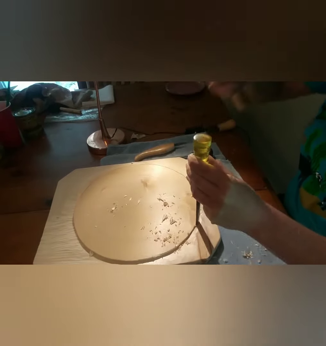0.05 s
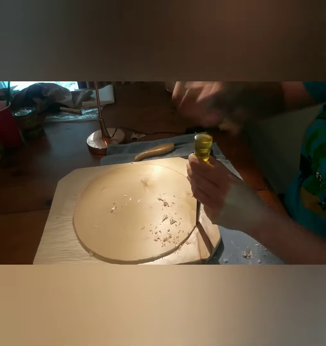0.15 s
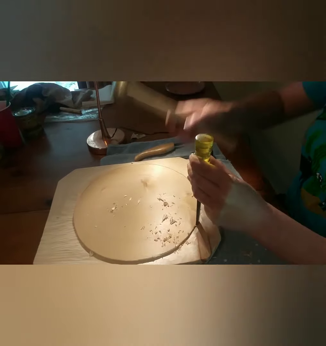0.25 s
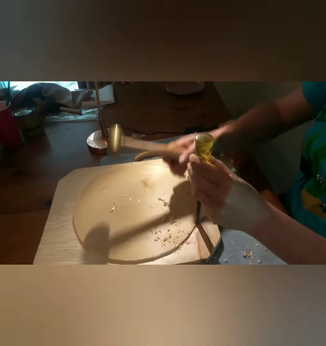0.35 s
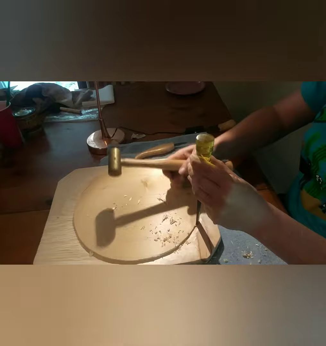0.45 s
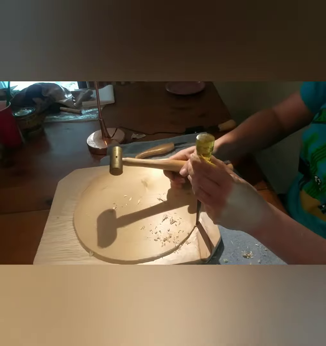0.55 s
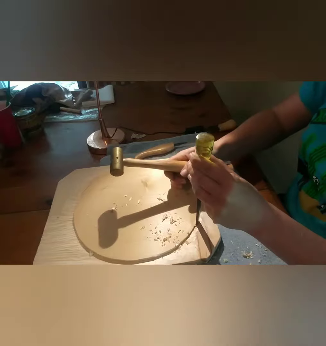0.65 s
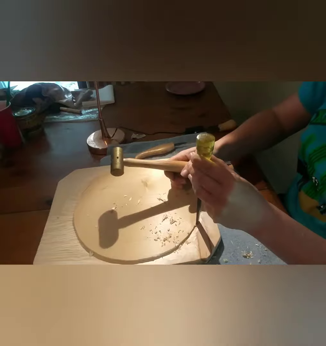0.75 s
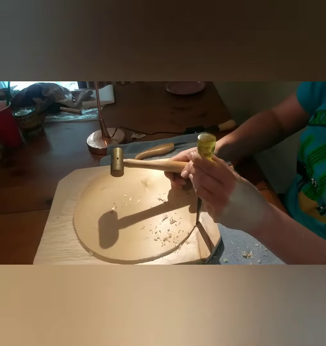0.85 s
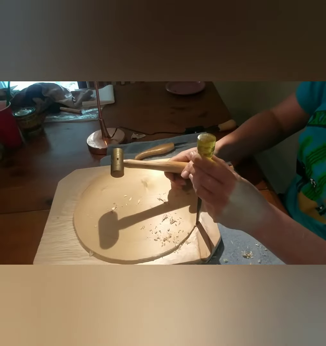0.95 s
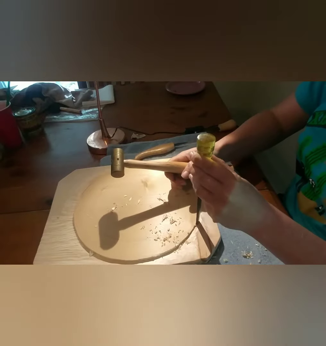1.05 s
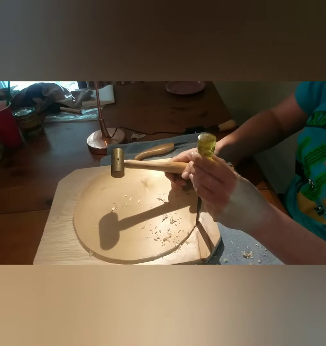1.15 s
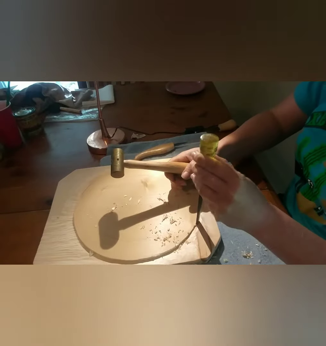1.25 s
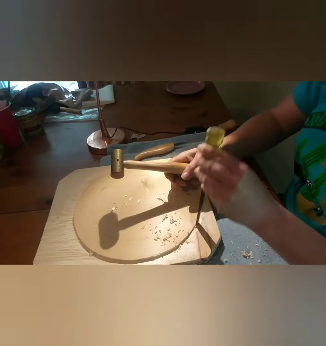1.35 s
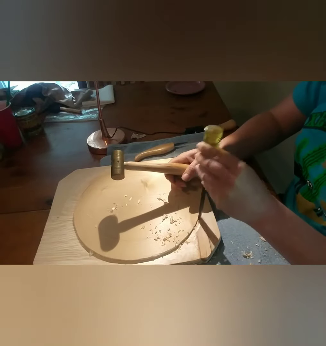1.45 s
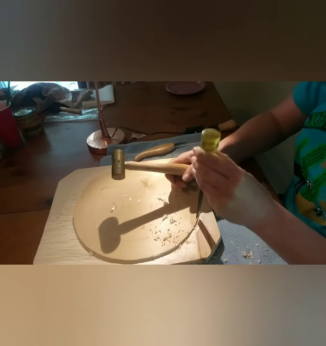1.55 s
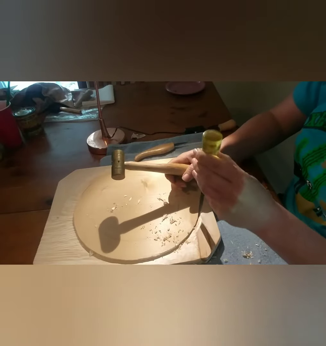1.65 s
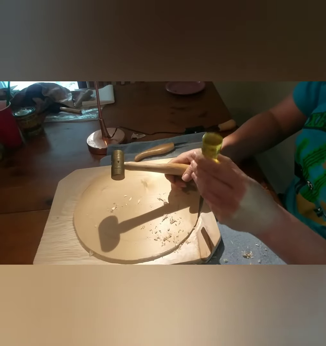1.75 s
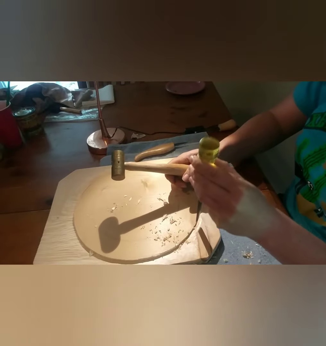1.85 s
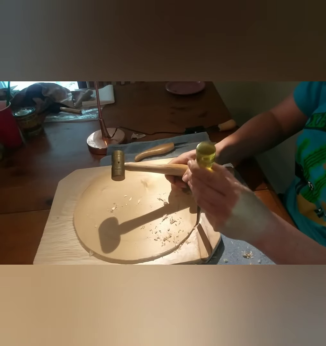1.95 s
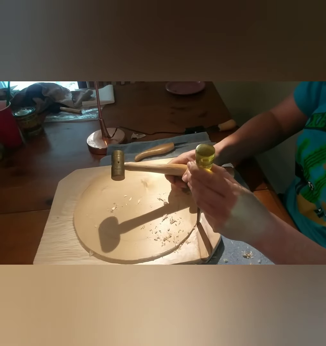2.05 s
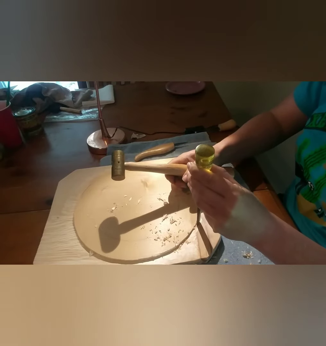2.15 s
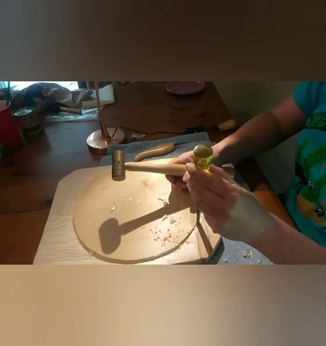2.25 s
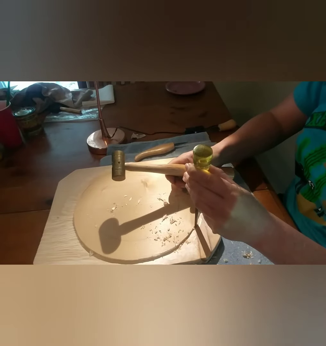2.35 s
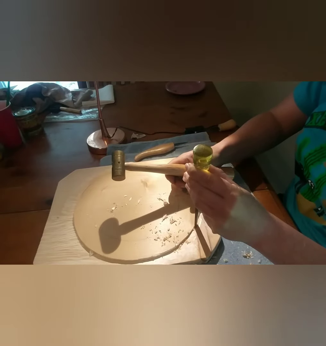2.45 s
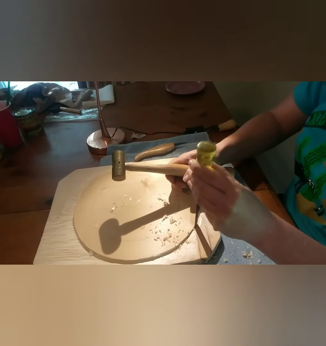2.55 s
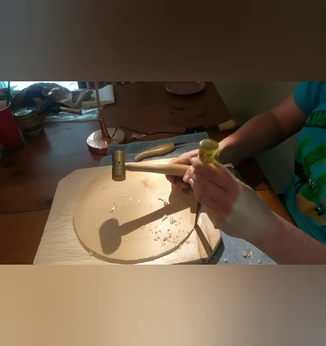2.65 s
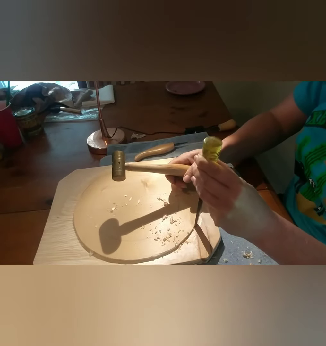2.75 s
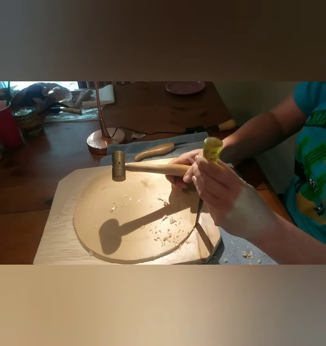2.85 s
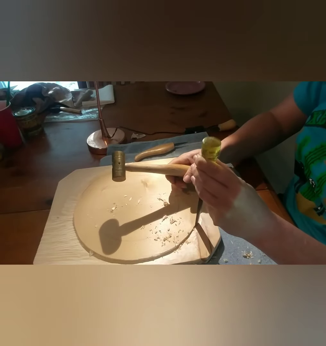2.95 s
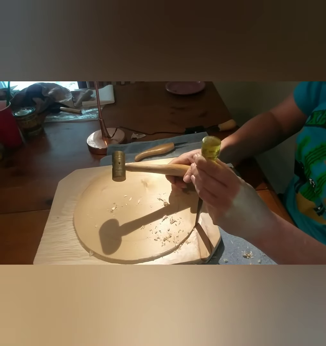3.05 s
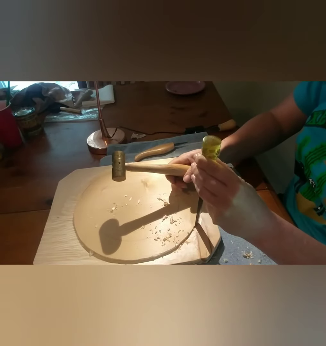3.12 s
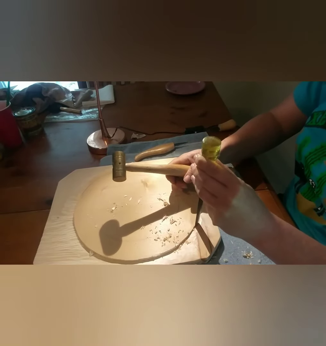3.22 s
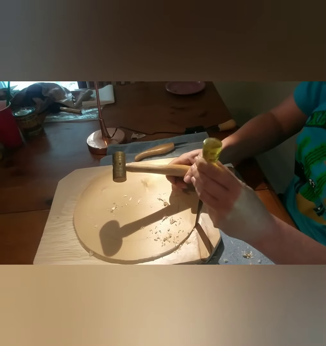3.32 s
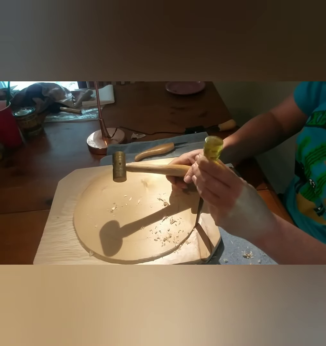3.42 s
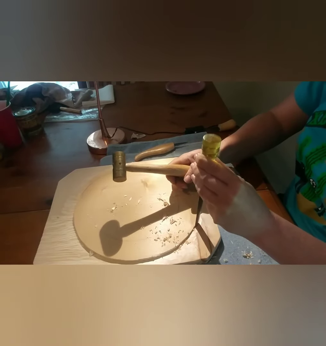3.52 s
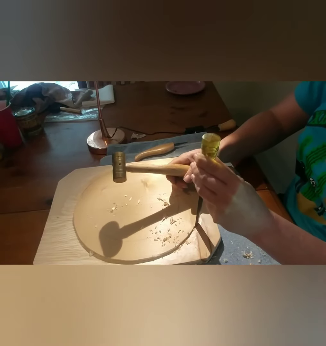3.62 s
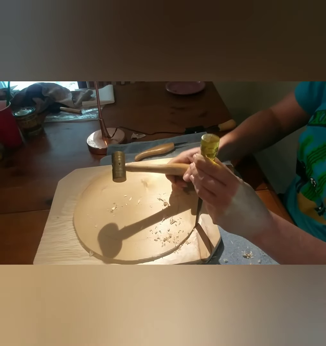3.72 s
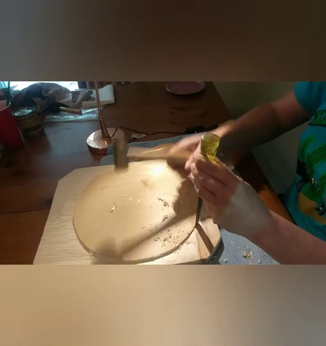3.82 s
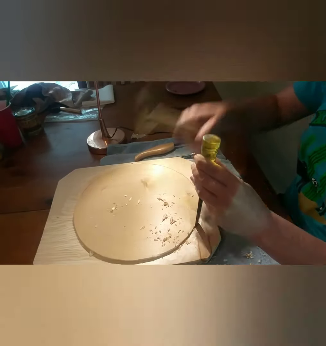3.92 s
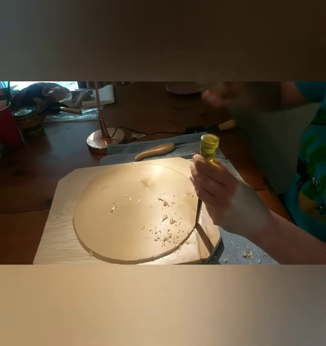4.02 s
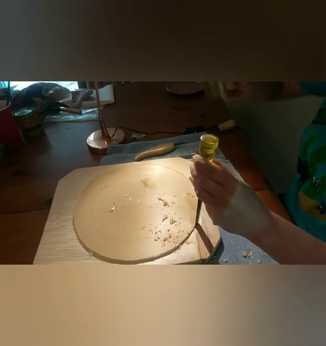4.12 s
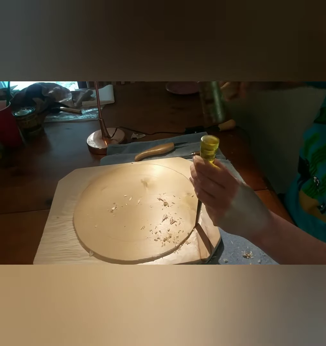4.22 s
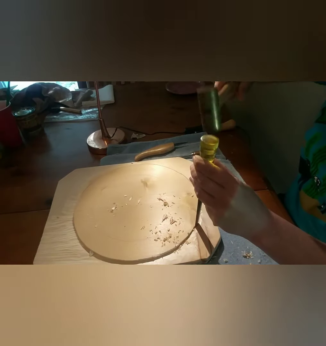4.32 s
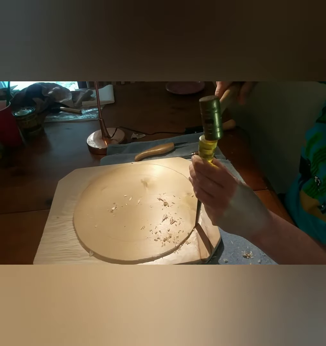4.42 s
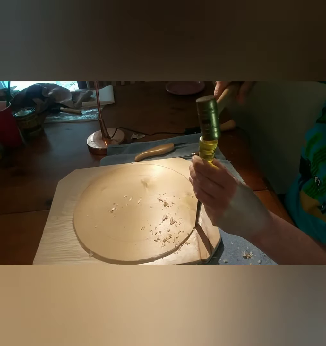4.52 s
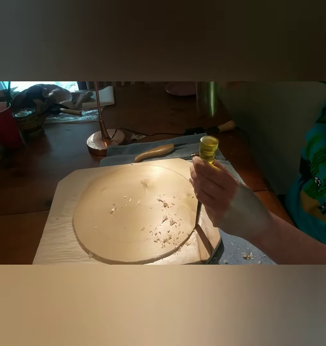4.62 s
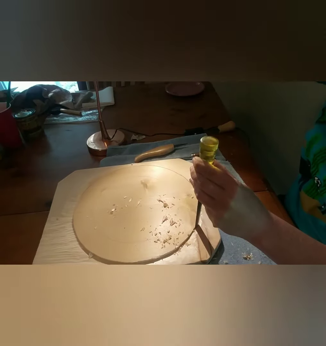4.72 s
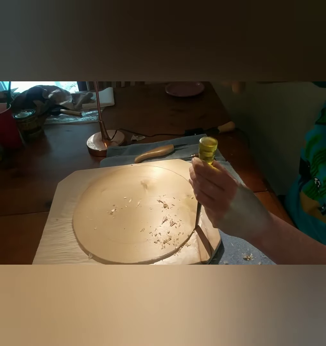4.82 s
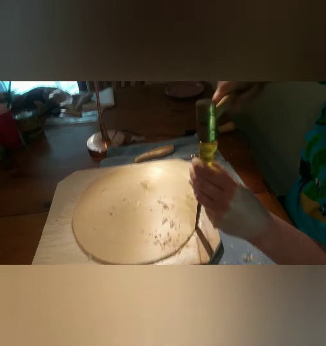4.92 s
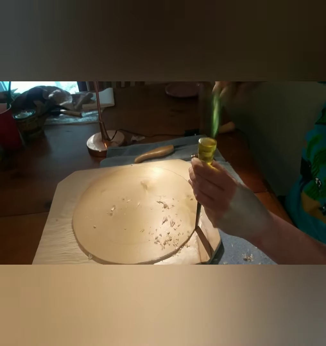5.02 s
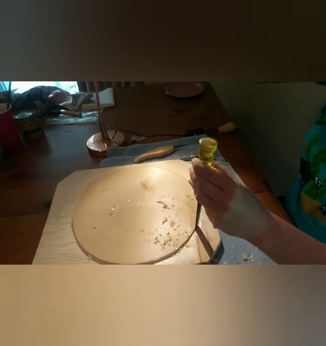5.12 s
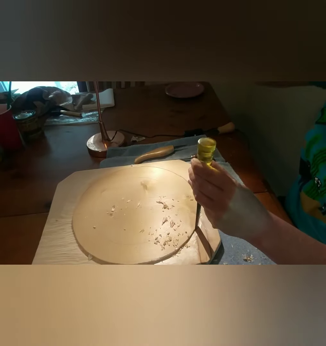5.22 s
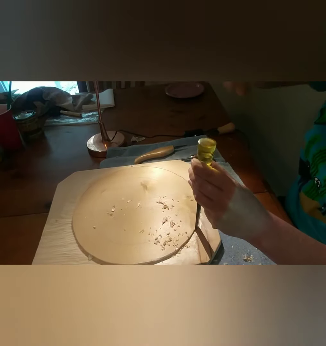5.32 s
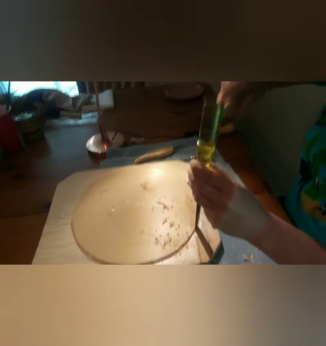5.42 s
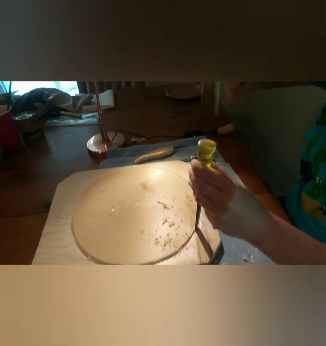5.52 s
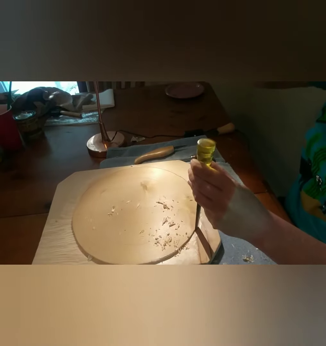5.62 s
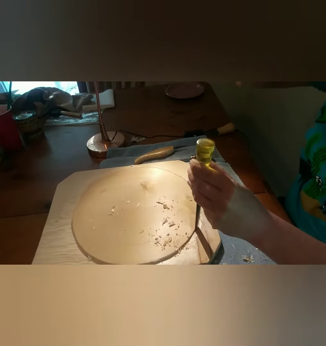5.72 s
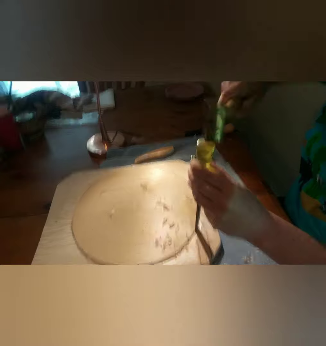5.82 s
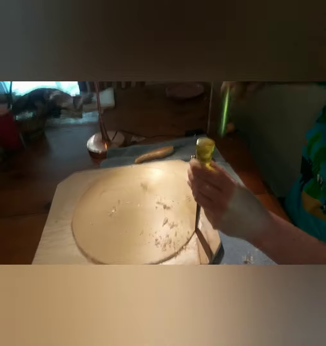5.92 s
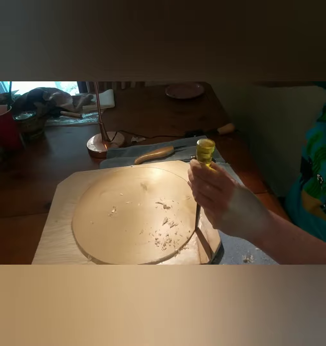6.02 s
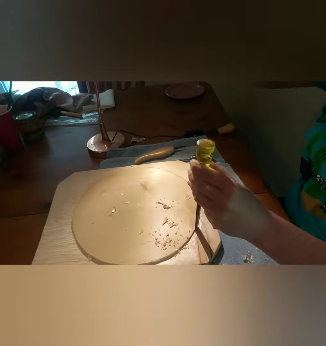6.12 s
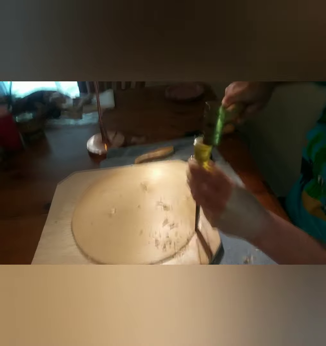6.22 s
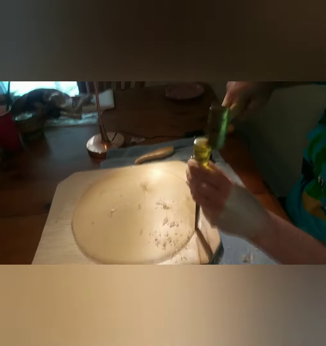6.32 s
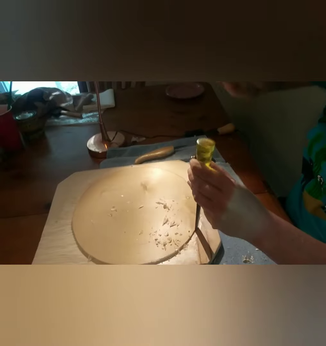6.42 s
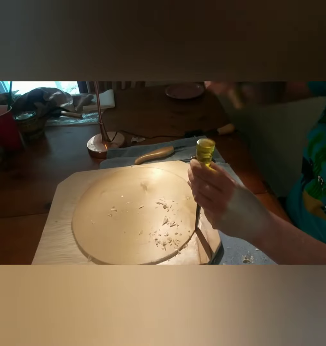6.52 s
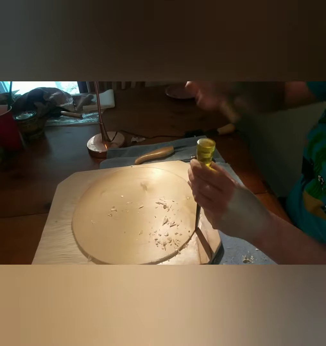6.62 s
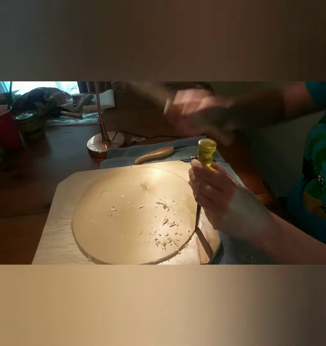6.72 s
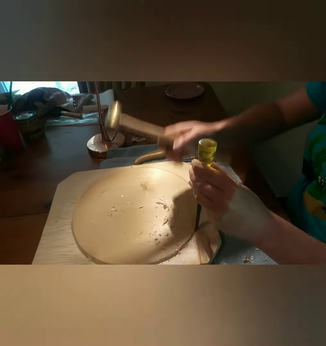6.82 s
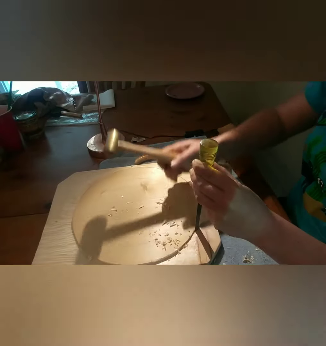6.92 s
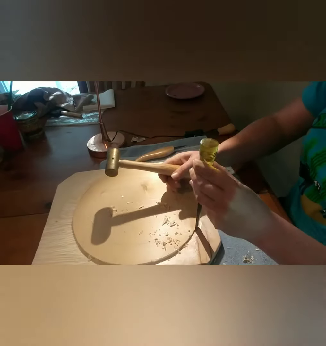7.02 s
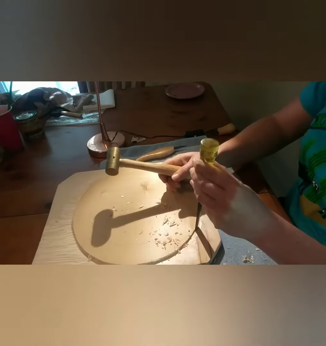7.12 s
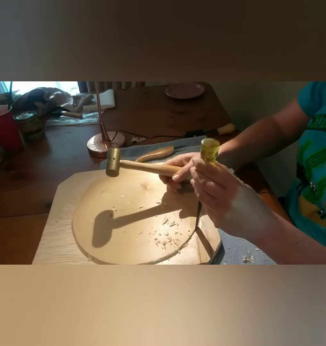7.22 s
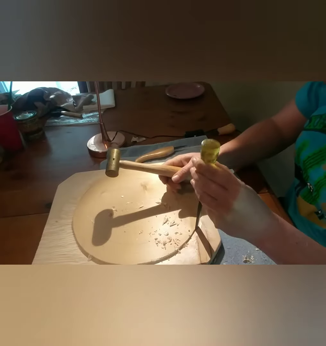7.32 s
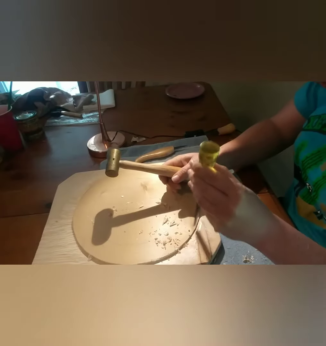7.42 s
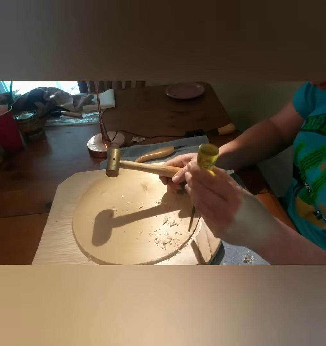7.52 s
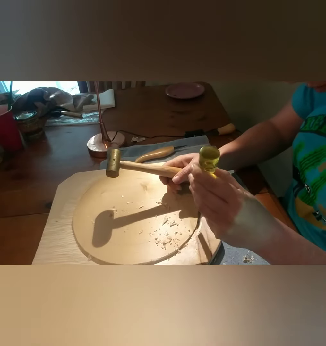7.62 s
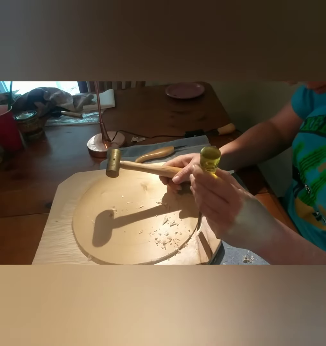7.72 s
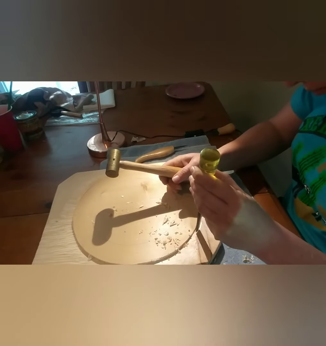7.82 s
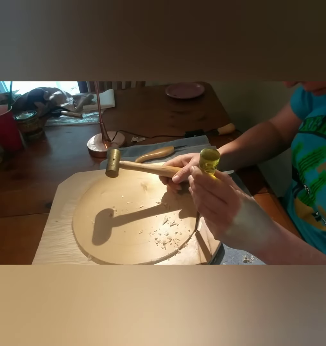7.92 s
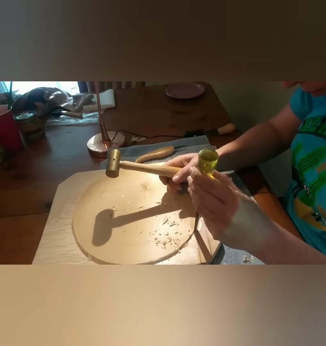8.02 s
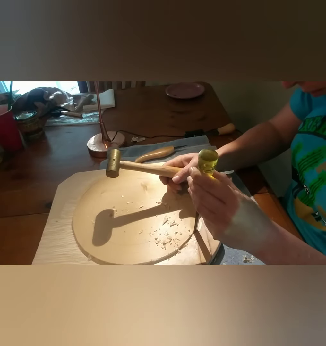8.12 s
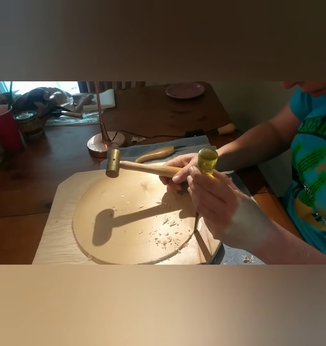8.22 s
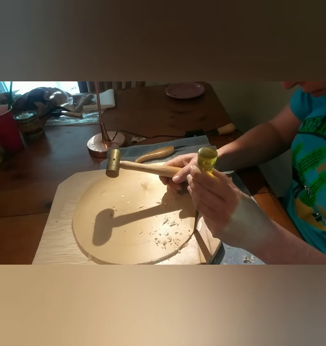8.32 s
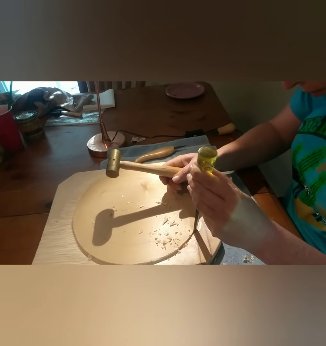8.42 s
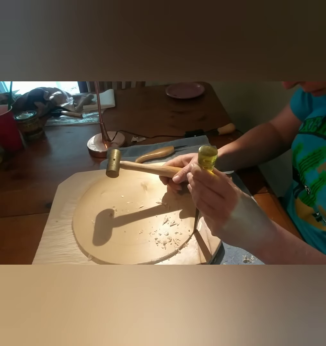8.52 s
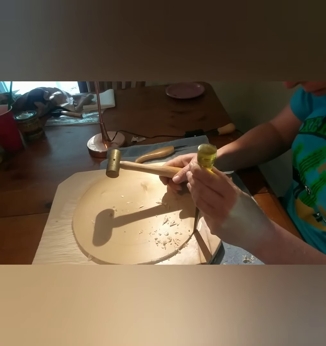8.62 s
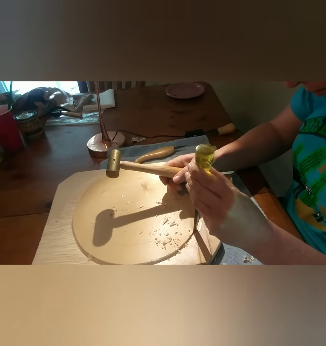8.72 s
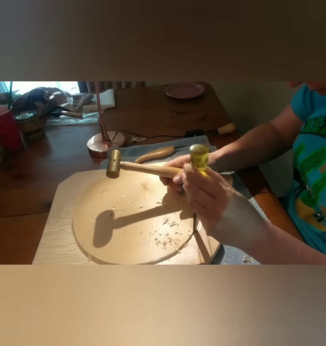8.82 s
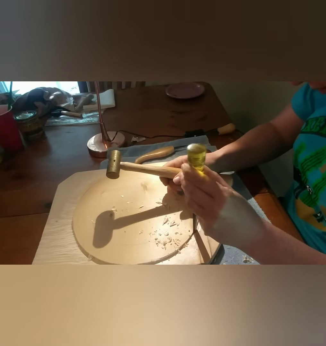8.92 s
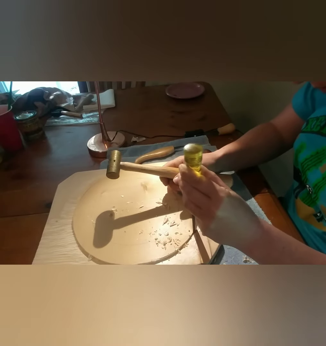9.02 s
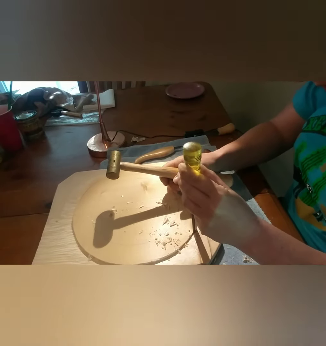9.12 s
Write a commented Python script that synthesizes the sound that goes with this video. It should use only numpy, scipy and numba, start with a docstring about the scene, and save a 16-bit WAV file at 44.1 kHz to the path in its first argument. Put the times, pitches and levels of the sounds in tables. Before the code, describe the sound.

After quiet tool nudges and a tiny steel clink, four sharp woody mallet blows ring out close up indoors, with faint hum and water behind.

```python
"""Indoors, at a table: a small mallet drives a chisel into a board, close to a pair of microphones.
The dying echo of an earlier blow opens the scene; tools are nudged and steel clinks, then a soft tap leads into
four hard blows, and more nudges follow. Contacts are rough cracks, ringing wood modes and decaying room noise.
Further off in the house, unsteady sine lines make a pump's hum over low noise, and water trickles as smeared
bubble chirps over fizz. A fast limiter on each channel flattens the hard blows and their loud echoes."""
import sys
import numpy as np
from scipy import signal
from scipy.fft import rfft, irfft, next_fast_len
from scipy.io import wavfile
from scipy.ndimage import uniform_filter1d, map_coordinates
from numba import njit

SR = 44100
rng = np.random.default_rng(int(sys.argv[2]) if len(sys.argv) > 2 else 0)


def unload_audio(sound):
    """Save the sound as a 16-bit wav file, at the path given as the first command line argument."""
    columns = np.transpose(np.atleast_2d(sound))
    # keep every value between -1 and 1, then stretch to whole-number steps
    steps = np.round(np.clip(columns, -1, 1) * 32767)
    wavfile.write(sys.argv[1], SR, steps.astype(np.int16))


N = 403956

# Colour of the house noise. Each row: frequency in Hz, relative density in dB per Hz.
HOUSE_COLOUR = [(18, -51.5), (30, -25.5), (42, -7.5), (65, -5.5), (87, -21), (108, -3), (149, -10),
                (185, -10.5), (244, -7.5), (312, -13.5), (447, -16.5), (518, -11.5), (1500, -28),
                (1950, -59), (3300, -120)]
# Lines of the pump motor. Each row: frequency in Hz, level in dB (only the balance against the first line counts).
MOTOR_LINES = [(59.2, -56), (118.4, -64), (177.6, -63), (236.9, -66.5), (527.6, -69.5), (705.2, -77)]
# Course of the background. Each row: time in seconds, lowest hum line in dB, house noise in dB before its wobble.
PUMP_COURSE = [(0, -53, -56.5), (.64, -59.5, -59), (1.5, -55.5, -57.5), (2.42, -58.5, -59.5),
               (3.21, -56.5, -58), (4.03, -58, -59), (5.302, -52.5, -57), (6.749, -51.5, -57.5),
               (7.09, -62, -59.5), (8.091, -56.5, -58.5), (9.16, -62, -59)]
# Clearest drops of the trickle. Each row: start in seconds, nominal bubble pitch in Hz, level in dB.
CLEAR_DROPS = [(0.15, 7800, -53.5), (0.331, 8270, -61.5), (0.412, 4120, -60.5), (0.58, 7700, -57),
               (0.729, 4400, -58), (0.816, 6500, -57), (1.213, 6400, -55), (1.379, 4500, -59),
               (1.58, 3000, -60.5), (1.71, 8300, -60), (1.826, 4740, -48), (2.0, 3640, -58),
               (2.429, 4540, -55), (2.525, 3600, -52), (2.818, 6100, -54.5), (2.952, 3730, -55),
               (2.978, 4970, -56), (3.251, 2920, -55), (3.352, 3800, -55), (3.439, 3140, -52),
               (3.498, 5640, -48), (3.615, 7060, -52), (3.634, 6800, -49), (3.736, 3800, -51.5),
               (3.985, 4540, -58), (4.171, 3900, -52), (4.357, 4500, -56.5), (4.58, 7460, -53.5),
               (4.815, 3620, -53), (6.789, 1980, -55.5), (6.85, 2710, -56), (6.891, 6340, -50.5),
               (6.94, 4300, -51), (6.949, 6980, -57), (7.207, 3980, -52.5), (7.462, 5600, -55),
               (7.883, 3355, -57), (7.938, 3850, -55), (8.095, 2370, -57.5), (8.385, 4500, -61),
               (8.496, 7680, -55.5), (8.588, 4470, -53), (8.687, 3850, -51.5), (8.803, 7900, -56),
               (8.867, 6200, -55), (8.925, 7270, -54), (9.018, 6290, -53.5)]
# Colour of the water's fizz. Each row: frequency in Hz, relative density in dB per Hz.
FIZZ_COLOUR = [(710, -35), (1200, -6), (2090, -8.5), (3700, -5), (5650, -7.5), (7570, -10), (9310, -17),
               (10400, -26), (13000, -18.5), (15200, -9), (16000, -7)]
# Steel touches steel. The one row: start in seconds, room level in dB, crack over the room in dB.
STEEL_TOUCH = (2.324, -35, 16)
# Resonances of the blade. Each row: frequency in Hz, width in Hz, level in dB.
BLADE_MODES = [(2130, 950, -2.5), (2830, 200, 11.5), (4500, 680, -6.5), (6100, 610, -9.5)]
# Tools set down or nudged on the board. Each row: start in seconds, room level in dB, contact brightness in Hz,
# bass of the echo in dB, boom of the table in dB.
TOOL_NUDGES = [(1.474, -40.5, 990, 5, -4), (2.030, -32, 950, 6.5, -1), (2.326, -44, 1810, 18, 0.5),
               (2.845, -57.5, 3500, 4, -5), (7.378, -55.5, 2400, -6, -16), (8.096, -51.5, 600, 1, -18),
               (8.339, -42, 890, 2, -14), (8.346, -48, 3530, 3, -14)]
# Mallet on the chisel handle. Each row: start in seconds, room level in dB, contact brightness in Hz,
# bass of the echo in dB, boom of the table in dB, crack over the room in dB.
MALLET_BLOWS = [(-.24, 28.5, 7800, -6, -21.5, 14), (4.4368, -13.5, 987, 0, 1, 16.5),
                (4.9382, 16.5, 13000, -6, -11, 15), (5.4084, 20, 13000, -2, -13, 14),
                (5.8421, 22, 13000, -5, -16, 10.5), (6.248, 21.5, 13000, 2, -17, 14.5)]
# Handle, blade and board under the blow. Each row: frequency in Hz, width in Hz, level in dB.
CHISEL_MODES = [(290, 90, -5), (480, 110, 1), (640, 70, 7), (1060, 160, 1), (2550, 200, 4),
                (3700, 500, -14), (5500, 1500, -15), (9000, 2000, -23), (12500, 2500, -28)]
# Ringing of table top and board. Each row: frequency in Hz, level in dB, longest 60 dB decay in seconds.
WOOD_MODES = [(76.15, -11, 0.38), (172.6, -10, .42), (241.3, -7.5, .33), (270, -8, 0.9), (291, -12.5, 0.45),
              (318.4, -4, 0.33), (347.4, -11.5, .3), (448.4, -4.5, .28), (502.6, -4, 0.45), (649, -6, 0.41),
              (686, -8, 0.11), (843, -7, 0.18), (906, -11, 0.23), (950, -4, .26), (974, -9, 0.063),
              (1130, -11.5, 0.16), (1330, -12.5, 0.27), (1610, -12, 0.29), (1885, -10.5, 0.31),
              (2130, -10.5, 0.32)]
# The table's deepest strong mode. The one row: frequency in Hz, 60 dB decay in seconds.
TABLE_BOOM = (143, 0.4)
# Nearest reflecting surfaces. Each row: shortest delay in seconds, level in dB.
NEAR_WALLS = [(.0045, -11), (.008, -5), (.016, -12.5), (.029, -13), (.040, -14)]
# Colour of the room's answer. Each row: frequency in Hz, relative density in dB per Hz.
ROOM_COLOUR = [(30, -43), (60, -10), (170, -7), (500, -5), (810, -2), (1760, -8.5), (2600, -6.5),
               (3300, -17.5), (6500, -30), (8400, -31.5), (10000, -52), (12000, -38), (16500, -52.5)]
# How fast the room dies away. Each row: frequency in Hz, 60 dB decay in seconds.
ROOM_DECAY = [(50, 0.41), (130, 0.35), (350, .3), (920, 0.28), (2430, 0.29), (6400, 0.31), (14000, 0.13)]
# How alike left and right are. Each row: frequency in Hz, correlation from 0 to 1.
LEFT_RIGHT = [(60, .93), (200, .92), (380, 0.87), (700, .25), (1300, 0), (2400, 0.11), (15000, 0.045)]
# Echo of a small drop. The one row: shortest hold in seconds, longest hold in seconds.
SMALL_HOLD = (.03, .075)

# Trickle: countless small drops, each with a lowest pitch, a highest-over-lowest ratio and a faintest level
SMALL_PER_S, SMALL_LOW_HZ, SMALL_SPAN = 80, 2070, 4.2
SMALL_DB, SMALL_SCATTER_DB = -69.5, 3  # both before the surges
CLEAR_HOLD_S = 0.063  # how long the echoes of a clear drop hold
SPLASH_DB = -9  # broad splash around a clear drop's bubble
FIZZ_DB = -64  # before the surges
SURGE_DB, SURGES_PER_S = 1, 11  # depth and knot rate of the little surges
FAR_LAG_S = 0.00027  # house sounds reach the left microphone later
# Loose tools jump at a contact, once it has built up: echo levels, first tick, upper edge
RATTLE_DB, NUDGE_RATTLE_DB, TICK_DB = -27.5, -24, -29
RATTLE_HZ, TICK_LATE_S = 3800, 0.0014
NUDGE_CRACK_DB = 7.5  # a nudge's contact over the room's answer
RING_DB = -8.5  # wood modes against the room's answer
PATCHY_DB = 1.52  # echoes arrive in uneven clumps
AIR_HZ, TOP_HZ = 14500, 16500  # microphone treble fade, top edge


def amp(db):
    """Decibels to a linear gain."""
    return 10 ** (np.asarray(db) / 20)


def unit(x):
    """Scales a sound to rms 1."""
    return x / np.sqrt(np.mean(x ** 2) + 1e-20)


def along(points, hz):
    """Reads a curve of (Hz, value) points on a log frequency axis."""
    f, v = np.transpose(points)
    return np.interp(np.log(hz + 1), np.log(f + 1), v)


def wobble(rate):
    """A smooth random curve with the given knots a second."""
    knots = rng.standard_normal(int(N * rate / SR) + 4)
    return map_coordinates(knots, [np.arange(N) * rate / SR])


def filtered(x, response):
    """Shapes a sound with a complex response of frequency."""
    m = next_fast_len(x.shape[-1] + 8192)
    spectrum = rfft(x, m) * response(np.fft.rfftfreq(m, 1 / SR))
    return irfft(spectrum, m)[..., :x.shape[-1]]


def lowpass(f, edge_hz):
    """Causal lowpass response, 24 dB an octave."""
    return 1 / (1 - (f / edge_hz) ** 2 + 1.4j * f / edge_hz) ** 2


def resonances(modes):
    """Causal response of resonant modes, alternating in sign."""
    def response(f):
        return sum((-1) ** k * amp(db) * 1j * f * width / (hz * hz - f * f + 1j * f * width)
                   for k, (hz, width, db) in enumerate(modes))
    return response


def diffuse(size, colour):
    """Stereo noise of rms 1: alike in the bass, nearly unrelated in the treble."""
    def mid_side(hz):
        turn = np.arccos(np.clip(along(LEFT_RIGHT, hz), -1, 1)) / 2
        return colour(hz) * np.array([np.cos(turn), np.sin(turn)])
    mid, side = filtered(rng.standard_normal((2, size)), mid_side)
    return unit(np.array([mid + side, mid - side]))


def add(track, s, sound):
    """Mixes a stereo sound in at time s, cut at both ends."""
    i = round(s * SR)
    part = sound[:, max(-i, 0):N - i]
    track[:, max(i, 0):max(i, 0) + part.shape[1]] += part


def later_left(x):
    """Sound from the far side reaches the left microphone a moment later."""
    return np.array([np.roll(x[0], round(FAR_LAG_S * SR)), x[1]])


def room(colour):
    """The room's diffuse answer: noise starting near rms 1, each frequency dying at its own speed."""
    hz, frame, z = signal.stft(diffuse(SR, colour), SR, nperseg=256)
    clumps = rng.standard_normal(z.shape[1:])
    for axis in (0, 1):
        clumps = uniform_filter1d(clumps, size=3, axis=axis)
    fade_db = -60 * frame / along(ROOM_DECAY, hz)[:, None]
    z = z * amp(PATCHY_DB * unit(clumps) + fade_db)
    tail = signal.istft(z, SR, nperseg=256)[1][:, :SR]
    return tail * (1 - np.exp(-np.arange(SR) / SR / 0.004))  # the echo builds up over a few milliseconds


def strike(response):
    """One contact of peak 1, rough for a few milliseconds, plus dull copies off the nearest surfaces."""
    t = np.arange(SR) / SR
    grit = 0.22 * np.exp(-t / 0.0026) * rng.standard_normal((2, SR))
    crack = filtered((t == 0) + grit, response)
    crack /= np.abs(crack).max()
    dull = filtered(crack, lambda f: lowpass(f, 2900))
    copies = [sum(amp(db) * np.roll(channel, round((s + rng.uniform(0, 0.0005)) * SR))
                  for s, db in NEAR_WALLS) for channel in dull]
    return crack + np.array(copies)


def house_noise():
    """The low noise of the house: coloured noise of slowly drifting, quickly wobbling level."""
    s, _, house_db = np.transpose(PUMP_COURSE)
    level_db = np.interp(np.arange(N) / SR, s, house_db) + 1 + wobble(18)
    return amp(level_db) * diffuse(N, lambda f: amp(along(HOUSE_COLOUR, f)))


def pump_hum():
    """The motor's sine lines, each slightly unsteady in level and phase."""
    t = np.arange(N) / SR
    s, line_db, _ = np.transpose(PUMP_COURSE)
    lines = np.zeros(N)
    for hz, db in MOTOR_LINES:
        level = amp(db - MOTOR_LINES[0][1] + 1.4 * wobble(2.5))
        lines += level * np.sin(2 * np.pi * (hz * t + rng.random()) + 0.27 * wobble(1))
    return np.sqrt(2) * amp(np.interp(t, s, line_db)) * lines  # root 2 turns rms into peak


def small_drops(surge_db):
    """Scatters small drops at random: start, pitch, level swayed by the surges, and echo hold."""
    chance = rng.random((SMALL_PER_S * N // SR, 4))
    s = chance[:, 0] * N / SR
    hz = SMALL_LOW_HZ * SMALL_SPAN ** chance[:, 1]
    db = SMALL_DB - SMALL_SCATTER_DB * np.log(1 - chance[:, 2]).clip(-2.5)
    db += surge_db[(s * SR).astype(int)]
    return np.c_[s, hz, db, np.interp(chance[:, 3], (0, 1), SMALL_HOLD)]


def bubbles(hz):
    """A bubble rings as a short, dying chirp of rising pitch, here at unit energy."""
    t = np.arange(300) / SR
    life = 4 / hz
    onset = np.sin(np.pi / 2 * np.minimum(t * hz, 1))
    chirps = np.exp(-t / life) * onset * np.sin(2 * np.pi * hz * (0.905 * t + 0.032 * t * t / life))
    return chirps / np.linalg.norm(chirps, axis=1, keepdims=True)


def trickle():
    """Far bubbles, each arriving only as a smear of echoes, with splashes and a fine fizz."""
    surge_db = SURGE_DB * wobble(SURGES_PER_S)
    clear = np.c_[CLEAR_DROPS, np.full(len(CLEAR_DROPS), CLEAR_HOLD_S)]
    s, hz, db, hold = np.r_[clear, small_drops(surge_db)].T[:, :, None]
    u = np.arange(SR // 6) / SR
    smear = (1 - np.exp(-u / 0.0034)) * amp(-60 * u / 0.72) / (1 + (u / hold) ** 4)
    echoes = smear[:, None] * rng.standard_normal((len(s), 2, len(u)))
    heard = signal.fftconvolve(bubbles(hz)[:, None], echoes, axes=2)
    fizz_colour = lambda f: amp(along(FIZZ_COLOUR, f))
    out = amp(FIZZ_DB + surge_db / 2) * diffuse(N, fizz_colour)
    spray = diffuse(N, fizz_colour)
    for when, _, level in CLEAR_DROPS:
        piece = np.roll(spray, -round(when * SR), 1)[:, :len(u)]
        add(out, when, amp(level + SPLASH_DB) * smear[0] * piece)  # row 0 is a clear drop's smear
    for when, level, sound in zip(s[:, 0], db[:, 0], heard):
        add(out, when, amp(level) * sound)
    return out


def clink():
    """A light tick of the resonant blade and its echo."""
    s, db, crack_db = STEEL_TOUCH
    out, blade = np.zeros((2, N)), resonances(BLADE_MODES)
    echo = room(lambda f: np.abs(blade(f)))
    add(out, s, amp(db) * (amp(crack_db) * strike(blade) + echo))
    return out


def contact_crack(contact_hz):
    """The contact excites chisel and board; loose tools tick just after."""
    def response(f):
        hit = lowpass(f, contact_hz) * resonances(CHISEL_MODES)(f)
        late = np.exp(-2j * np.pi * f * TICK_LATE_S)
        return hit + amp(TICK_DB) * lowpass(f, RATTLE_HZ) * late
    return strike(response)


def contact_echo(contact_hz, bass_db, rattle_db):
    """The room answers the contact, duller when it is soft, and the rattle of loose tools."""
    def colour(f):
        body = amp(along(ROOM_COLOUR, f) + bass_db / (1 + (f / 400) ** 2)) * np.abs(lowpass(f, contact_hz)) ** 2
        # the rattle fills in above the cut of a soft contact
        rattle = amp(rattle_db) * np.abs(lowpass(f, RATTLE_HZ)) / (1 + (contact_hz / f.clip(1)) ** 4)
        return body + rattle
    return room(colour)


def wood_ring(contact_hz, boom_db):
    """Table and board ring in decaying modes, high ones weaker under a soft contact, over a deep boom."""
    t = np.arange(SR) / SR
    hz, level_db, t60 = np.transpose(WOOD_MODES)[:, :, None]
    strength = amp(level_db + 2 * rng.standard_normal(hz.shape)) * np.abs(lowpass(hz, contact_hz)) ** 2
    decay = amp(-60 * t / np.minimum(t60, along(ROOM_DECAY, hz)))
    skew = np.arccos(np.clip(along(LEFT_RIGHT, hz), -1, 1))  # high modes reach left and right out of step
    modes = np.array([np.sum(strength * decay * np.sin(2 * np.pi * hz * t + turn), 0) for turn in (0, skew)])
    boom_hz, boom_t60 = TABLE_BOOM
    boom = amp(boom_db - 60 * t / boom_t60) * np.sin(2 * np.pi * boom_hz * t)
    return (amp(RING_DB) * modes + boom) * (1 - np.exp(-t / 0.016))  # the heavy top takes time to swing up


def knocks():
    """Each blow or nudge cracks, fills the room and sets the wood ringing."""
    out = np.zeros((2, N))
    contacts = [(*row, RATTLE_DB) for row in MALLET_BLOWS]
    contacts += [(*row, NUDGE_CRACK_DB, NUDGE_RATTLE_DB) for row in TOOL_NUDGES]
    for s, db, contact_hz, bass_db, boom_db, crack_db, rattle_db in contacts:
        crack = amp(crack_db) * contact_crack(contact_hz)
        echo = contact_echo(contact_hz, bass_db, rattle_db)
        add(out, s, amp(db) * (crack + echo + wood_ring(contact_hz, boom_db)))
    return out


def scene():
    """The far house behind, the work on the table in front."""
    far = later_left(house_noise() + pump_hum() + trickle())
    return far + clink() + knocks()


@njit
def follow(x, rise, fall):
    """Peak follower: fast up, slower down."""
    level, out = 0., np.empty(len(x))
    for i in range(len(x)):
        level = level + rise * (abs(x[i]) - level) if abs(x[i]) > level else level * fall
        out[i] = level
    return out


def record(dry):
    """The left channel is less sensitive; each has its own limiter, and what outruns it clips softly."""
    x = dry * amp([[-1.7], [1.5]])
    # 0.94 ms rise, 500 dB a second fall
    level = np.array([follow(channel, 1 / (0.00094 * SR), amp(-500 / SR)) for channel in x])
    x = x / np.maximum(level / 0.48, 1)
    x = x / (1 + np.abs(x / 0.84) ** 6) ** (1 / 6)
    x = filtered(x, lambda hz: 1 / np.sqrt(1 + (hz / AIR_HZ) ** 16))
    return filtered(x, lambda hz: np.clip((TOP_HZ - hz) / 600 + 0.5, 0, 1) ** 2)


dry = scene()
out = record(dry)
unload_audio(out)
```